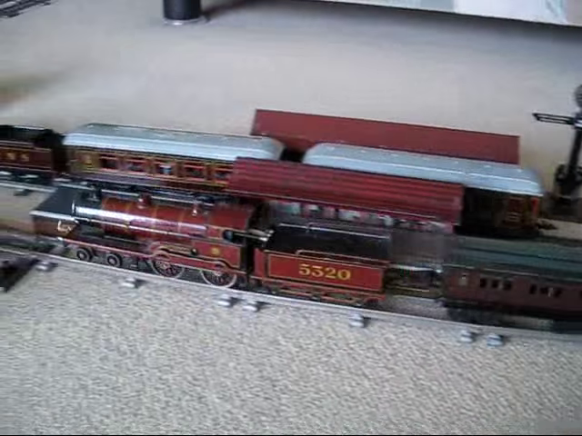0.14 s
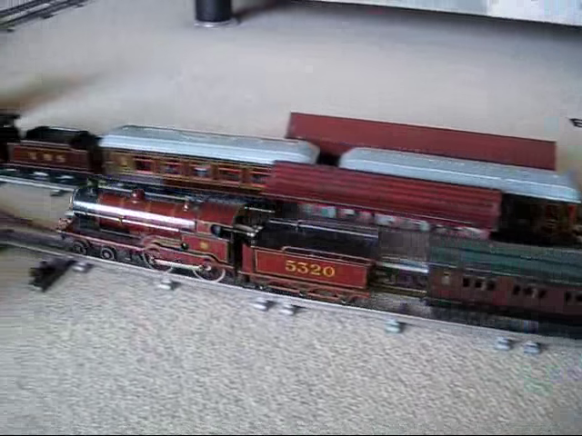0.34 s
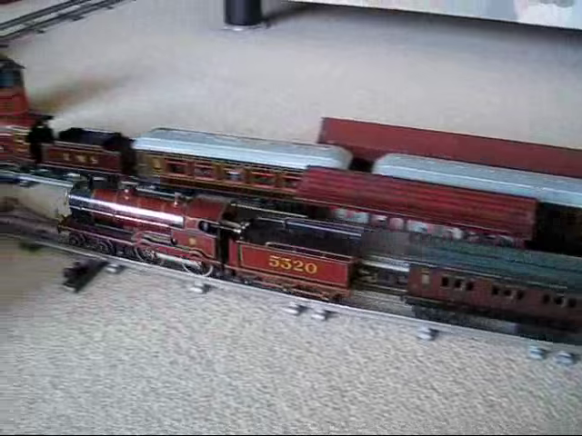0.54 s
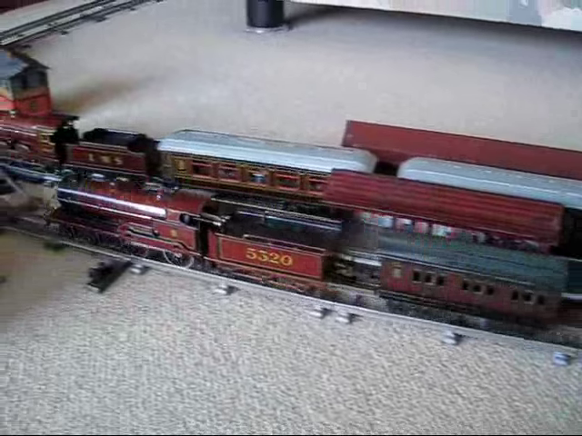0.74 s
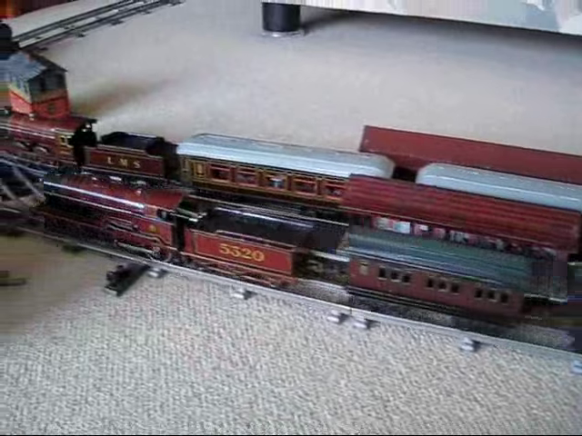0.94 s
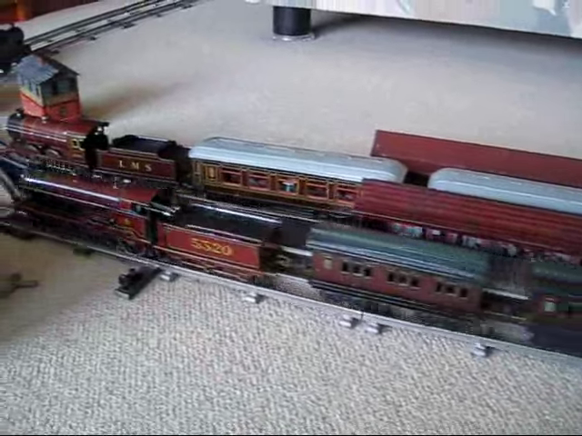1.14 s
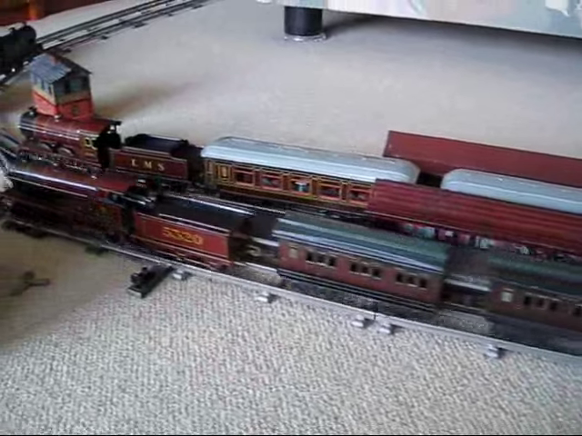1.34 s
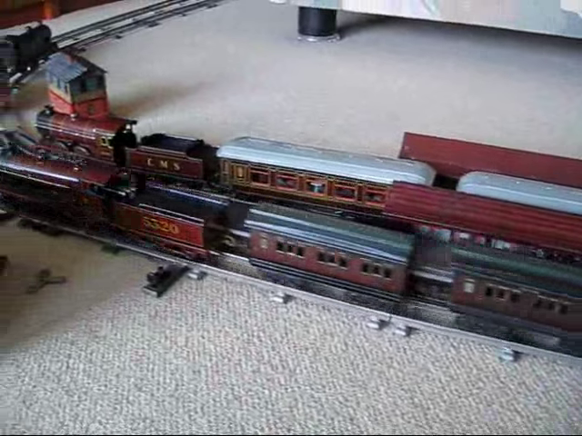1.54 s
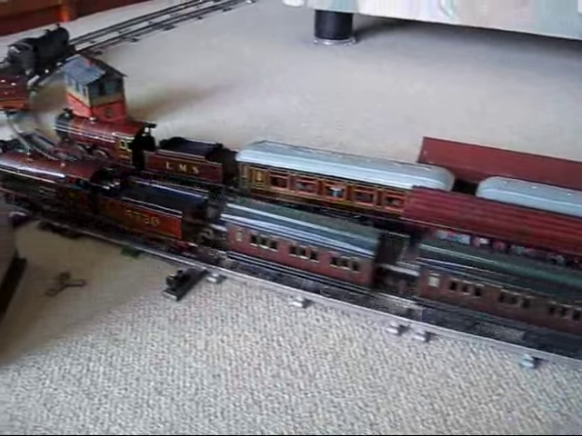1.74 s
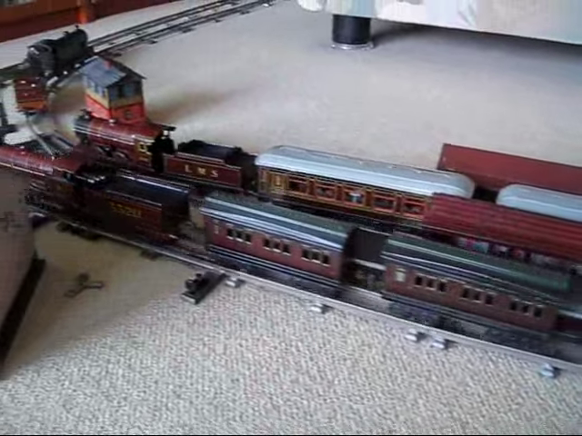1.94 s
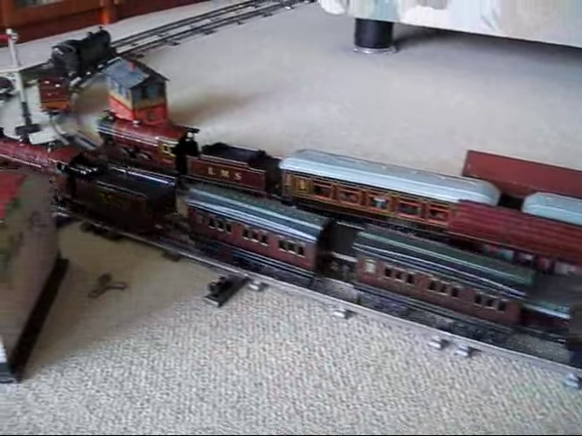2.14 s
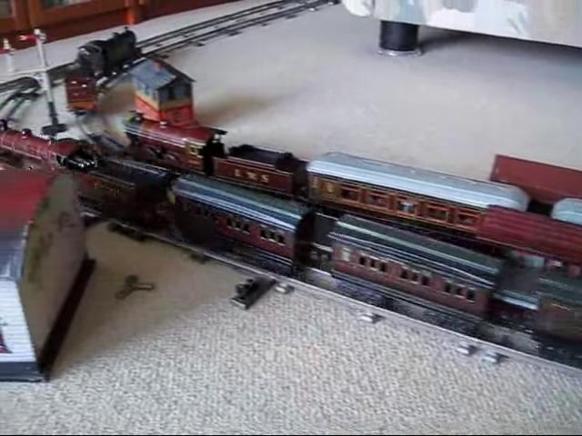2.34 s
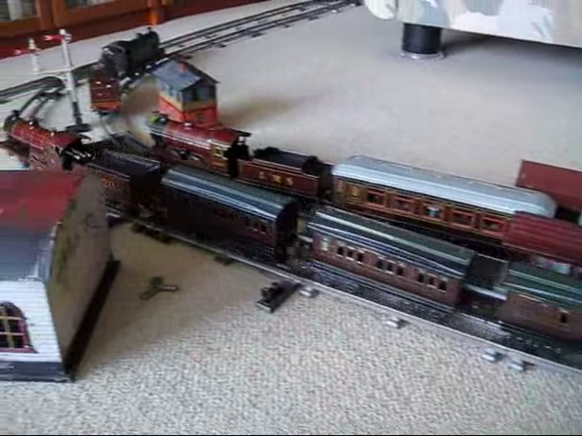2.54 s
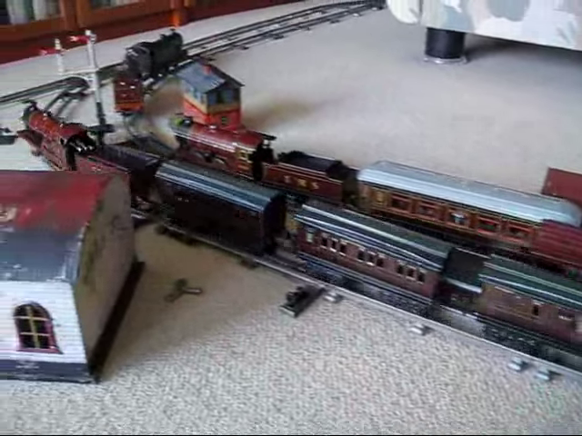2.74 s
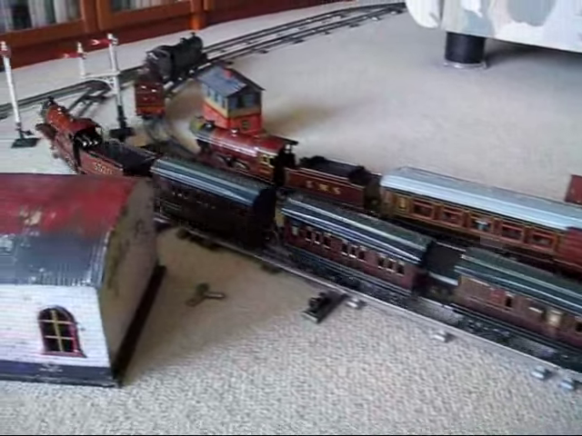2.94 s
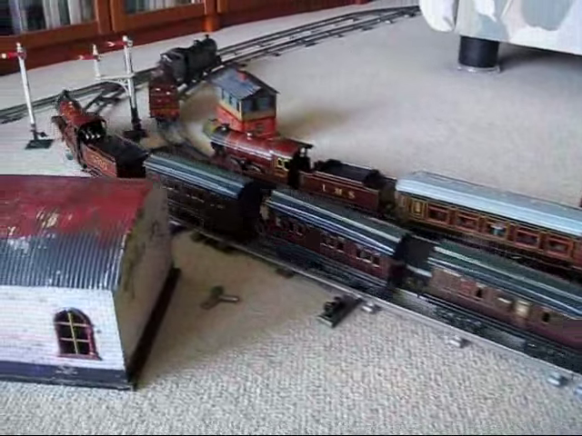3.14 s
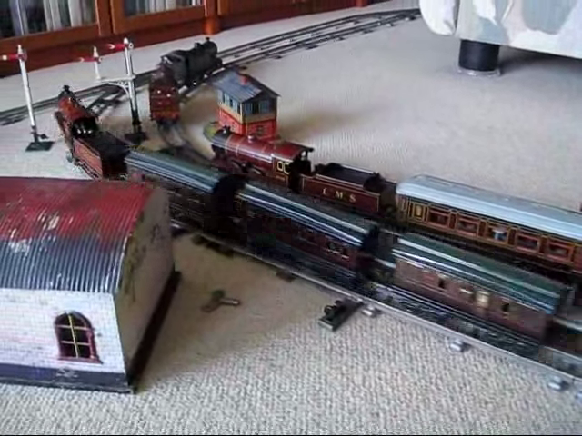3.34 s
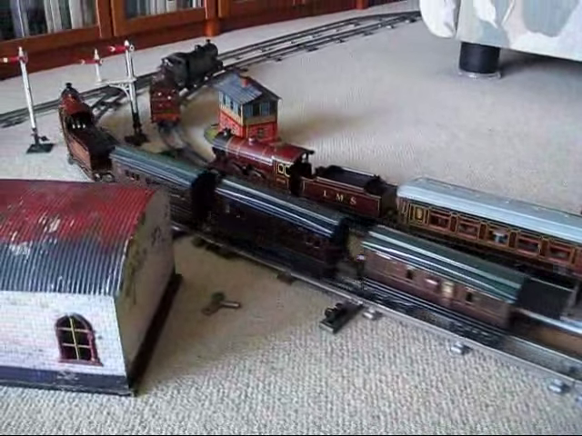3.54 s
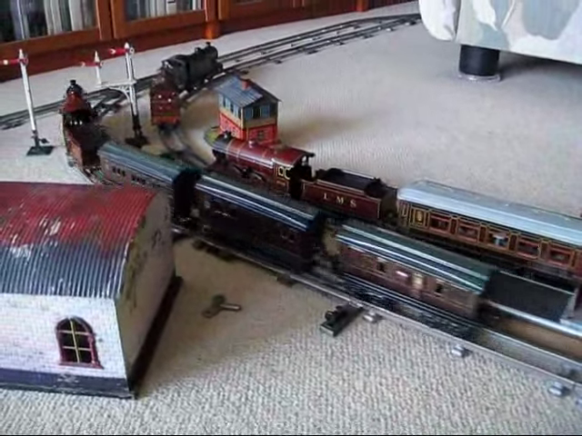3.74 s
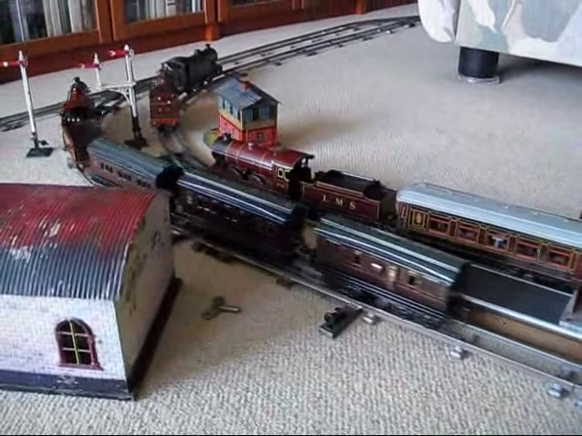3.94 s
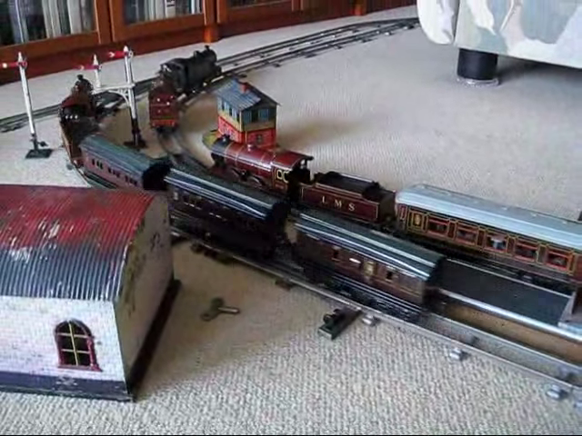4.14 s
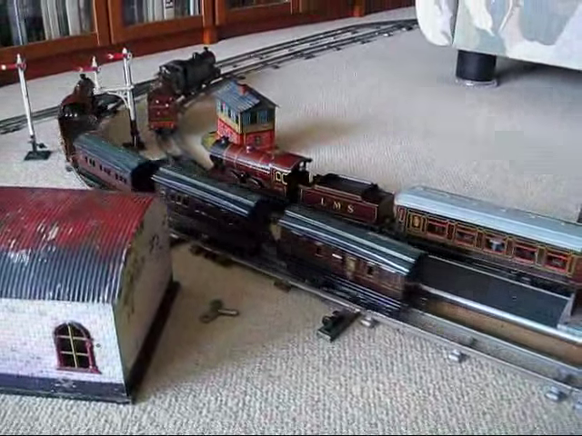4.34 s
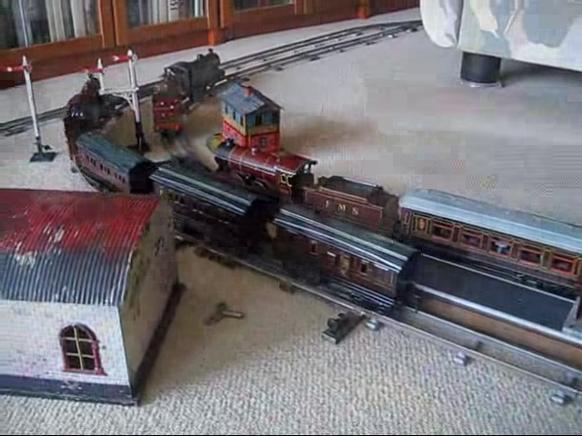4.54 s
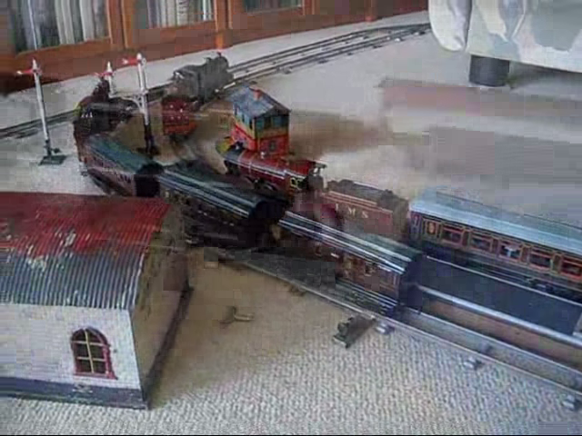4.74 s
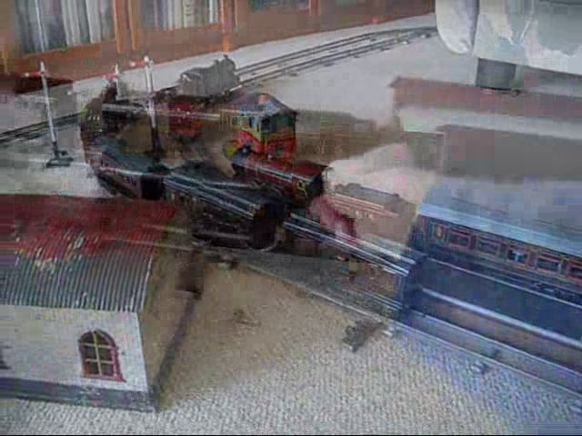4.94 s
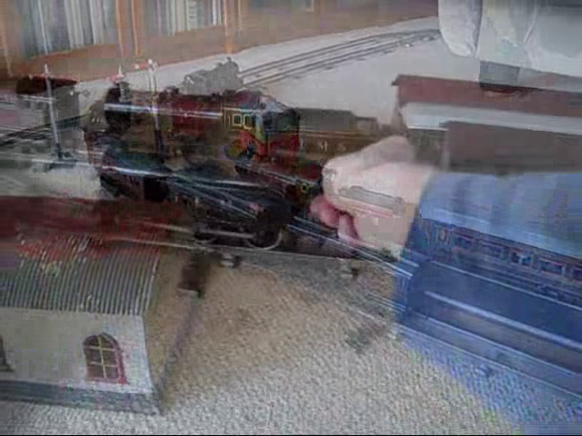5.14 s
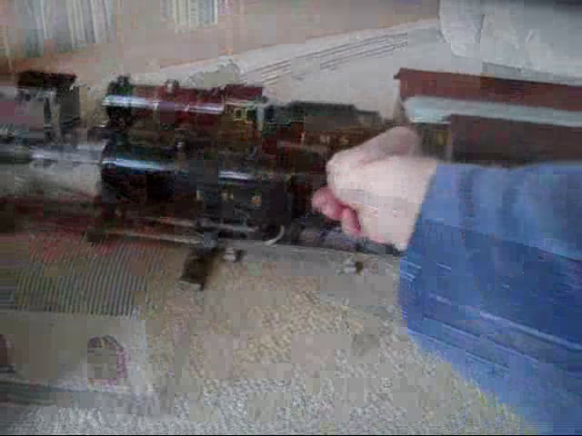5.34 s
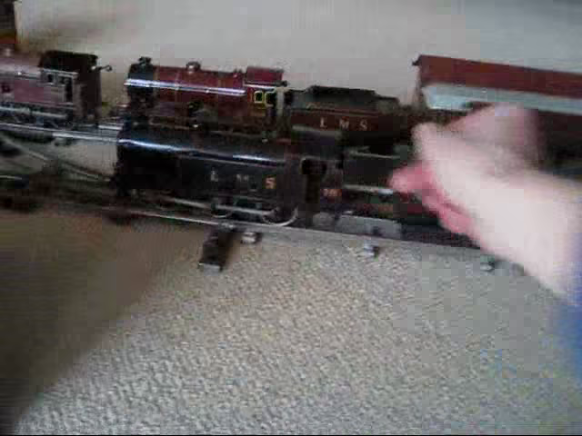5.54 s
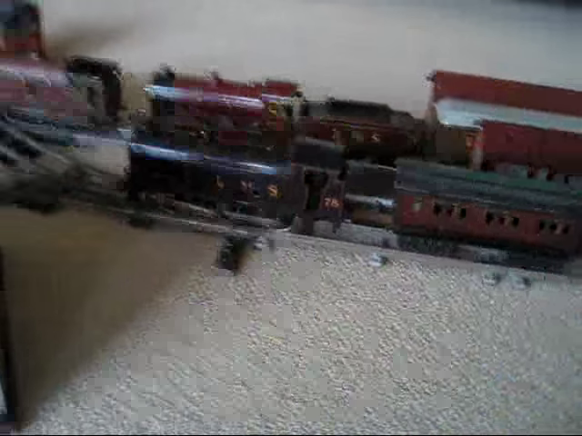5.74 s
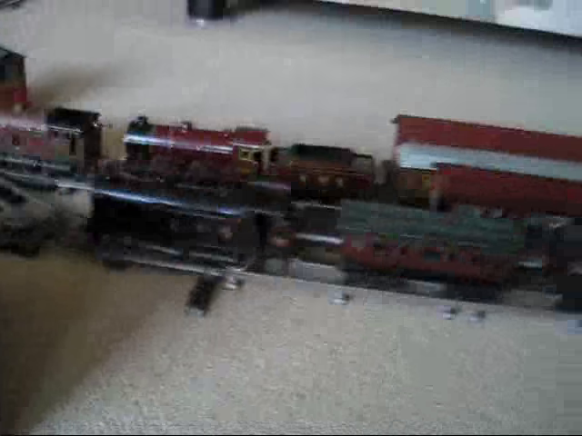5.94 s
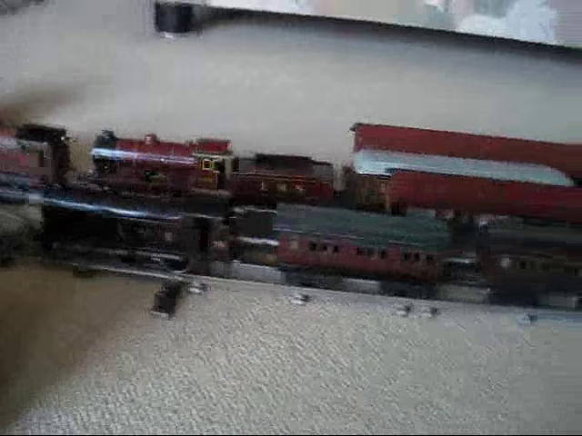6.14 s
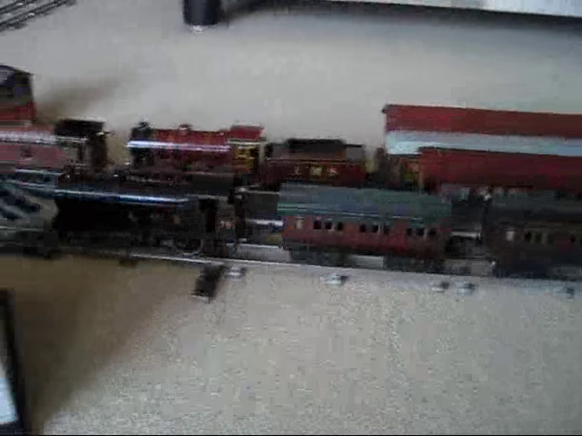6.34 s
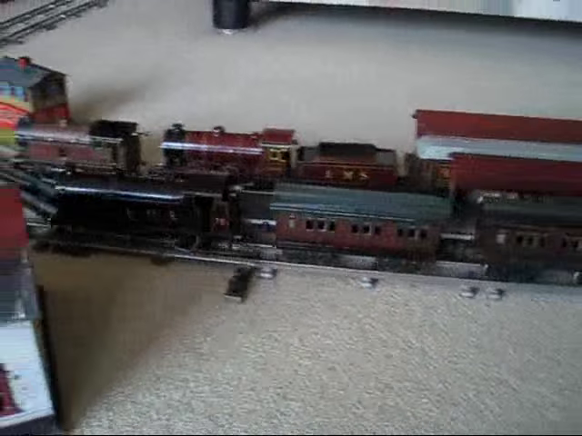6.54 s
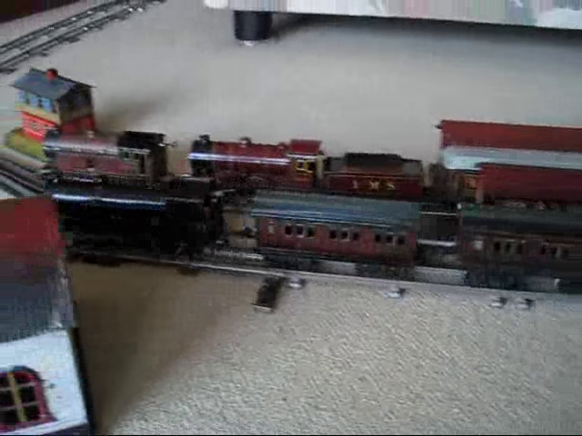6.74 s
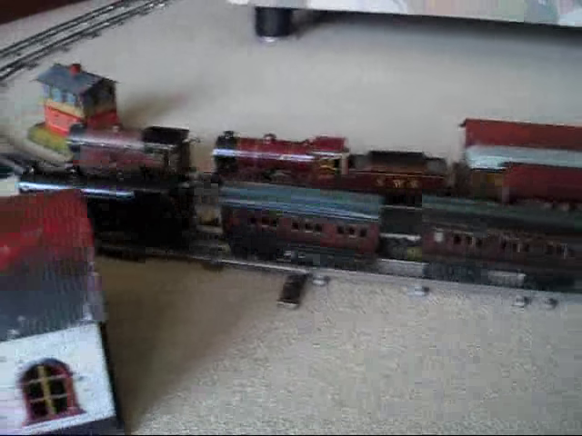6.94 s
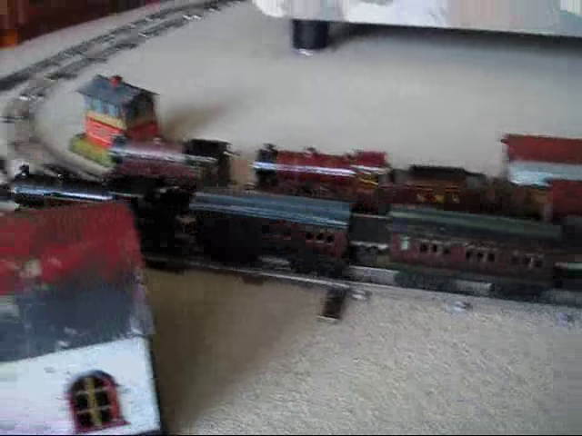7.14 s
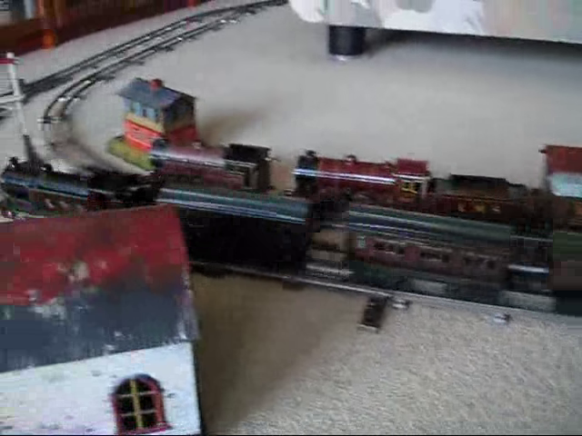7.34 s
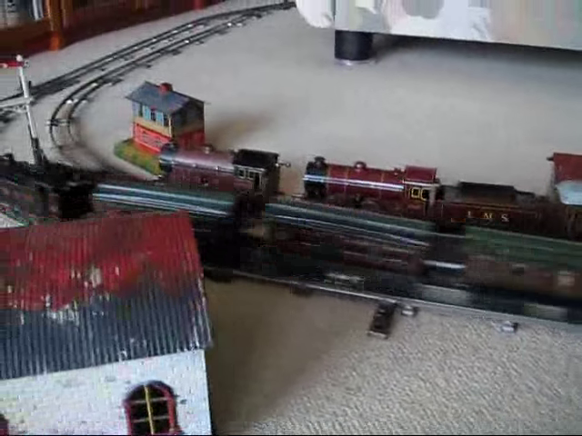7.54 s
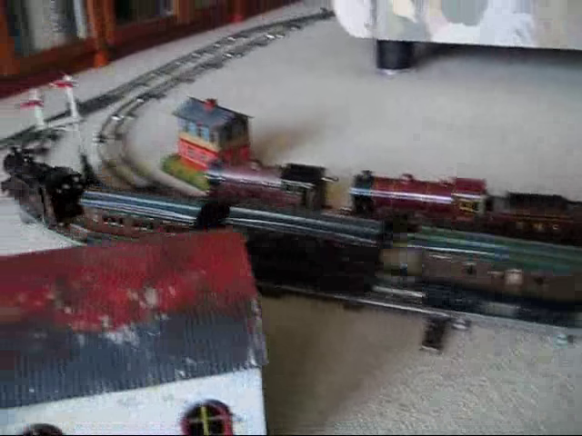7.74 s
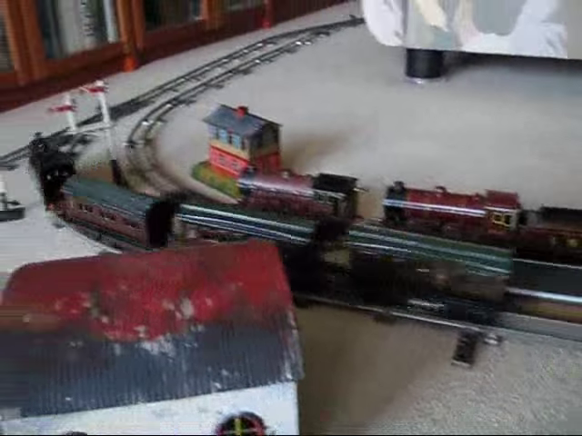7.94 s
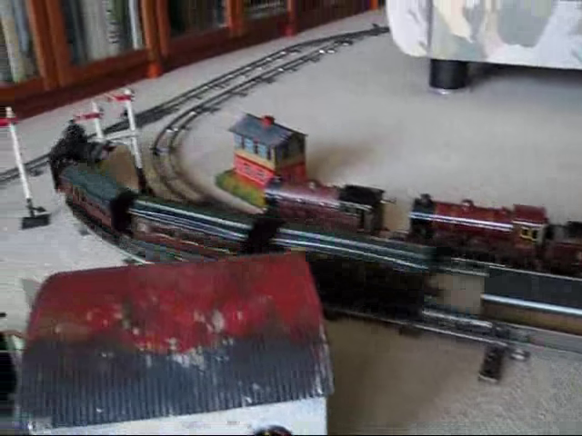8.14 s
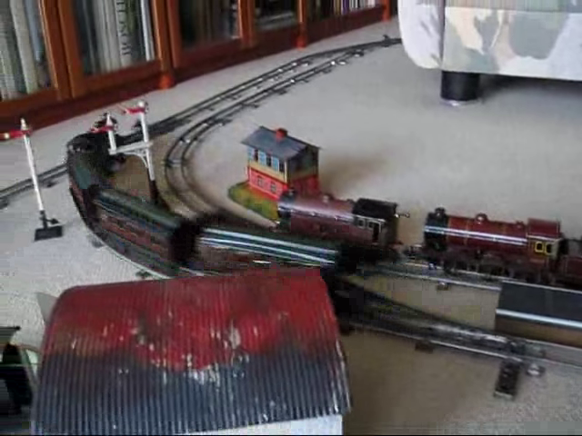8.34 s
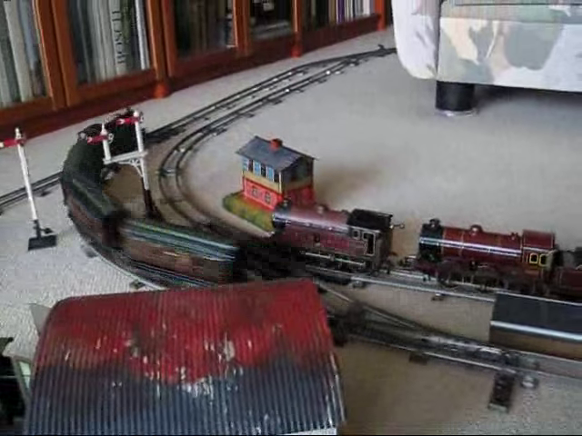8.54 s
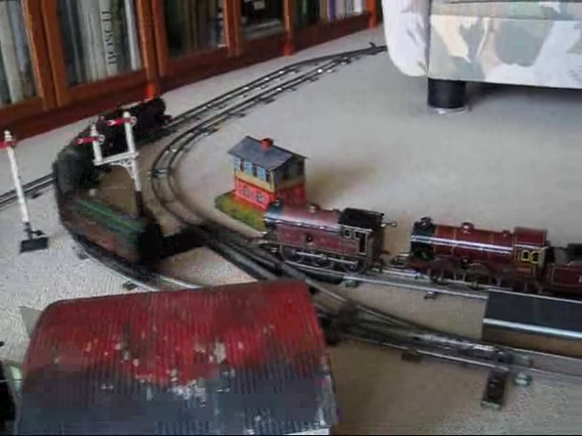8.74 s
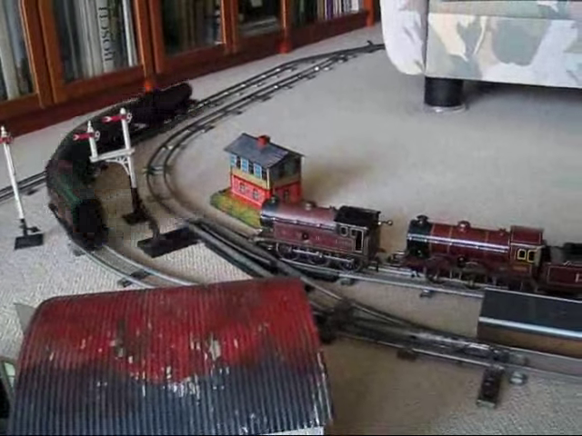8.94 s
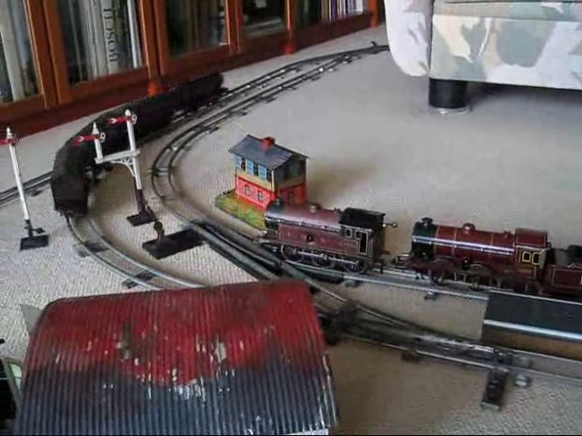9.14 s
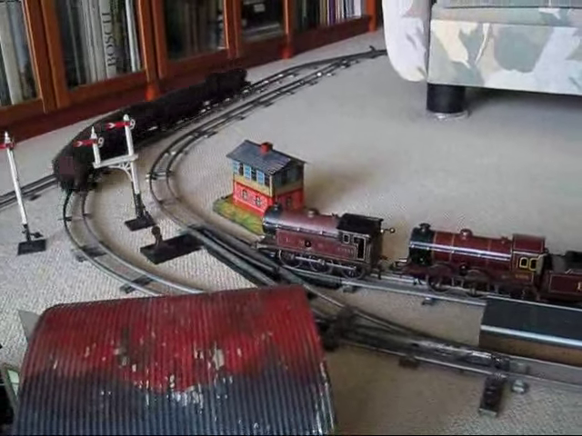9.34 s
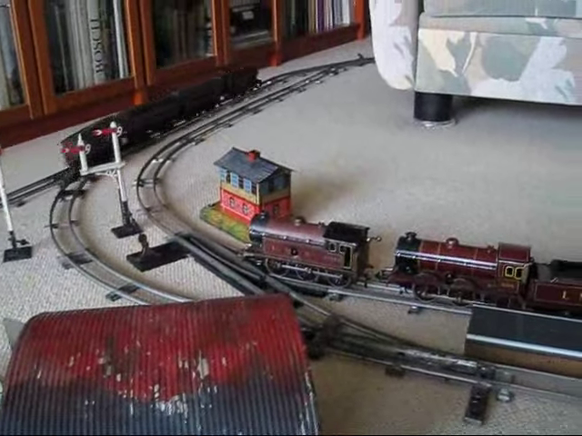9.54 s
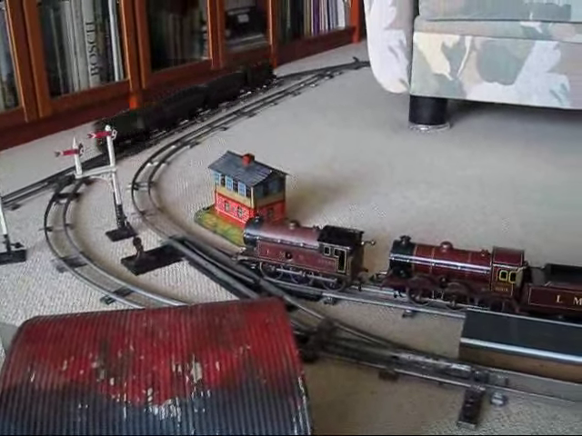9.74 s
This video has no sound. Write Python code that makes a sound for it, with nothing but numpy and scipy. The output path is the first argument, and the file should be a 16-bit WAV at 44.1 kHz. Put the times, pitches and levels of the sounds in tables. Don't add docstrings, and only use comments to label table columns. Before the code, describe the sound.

Clockwork tin train rattles past on metal track and fades, then couplings clank and a second one whirs up to speed close by.

```python
import sys
import numpy as np
from scipy import signal
from scipy.fft import rfft, irfft, next_fast_len
from scipy.io import wavfile
from scipy.ndimage import uniform_filter1d, map_coordinates

SR = 44100
rng = np.random.default_rng(int(sys.argv[2]) if len(sys.argv) > 2 else 0)


def pcm_store(signal):
    levels = np.round(np.clip(np.atleast_2d(signal), -1, 1) * 32767)
    wavfile.write(sys.argv[1], SR, levels.astype(np.int16).T)


def voltage_ratio(decibels):
    exponent = np.asarray(decibels, float) / 20
    return 10 ** exponent


N = 436149

STAGE_S = (0, 4.9, 7.87, 9.89)
# time in [s], rattle in [dB].
LEAVING = [
    (0, -23.5),
    (1.9, -23.5),
    (2.3, -22.5),
    (2.7, -24.5),
    (3.3, -27),
    (3.65, -30.5),
    (4.2, -34.5),
    (4.55, -42),
    (4.75, -54),
    (5.25, -62),
]
# time in [s], rattle in [dB], speed [0-1].
STARTING = [(5.5, -54, 0.5), (5.78, -50.5, 0), (6.05, -45, 0), (6.2, -42.5, 0), (6.24, -42, 0),
            (6.5, -33, 0.1), (6.9, -23.5, 0.57), (7.38, -19, 0.98), (8.1, -23, 1), (8.6, -23, 0.97),
            (8.85, -22.5, 0.83), (9.2, -21.5, 0.87), (9.89, -22.5, 0.91)]
# time in [s],
# level in [dB].
AIR_LEVEL = [(0, -1.5), (1.3, -1.5), (2.15, -0.5), (2.45, -2), (4, 0), (5.53, -1), (5.66, 11), (5.8, -5),
             (6.3, -6), (7, -1), (8.84, 0), (9.89, 2.5)]
# time in [s], share [1].
RAGGED = [(0, 1.26), (3, 1.18), (4.6, 1.55), (6.1, 1.4), (6.5, 1), (7.8, 0.84), (8.7, 0.84), (9.89, 0.63)]
# frequency in [Hz], density in [dB per Hz].
BODY = [
    [(71, -66), (120, -33.5), (191, -11.5), (286, -12.5), (497, -3), (605, -5.5), (950, -4.5), (1280, -3), (1900, -4), (2470, -10), (4180, -120)],
    [(71, -60), (120, -24), (279, -9), (347, -7.5), (605, -2.5), (687, 2.5), (1210, -1.5), (1490, -11), (1900, -3.5), (2470, -57), (4180, -120)],
    [(71, -59), (120, -36), (276, -11.5), (343, -15.5), (503, -7.5), (565, -10.5), (671, -4), (1120, -4), (1900, -5.5), (2470, -42), (4180, -120)],
]
TIN = [
    [(940, -28), (1600, -17), (2530, -1.5), (3130, 1), (3740, -0.5), (4070, -2), (4990, 0), (6530, -5), (7210, -12.5), (7700, -11), (10000, -27), (16900, -120)],
    [(940, -27), (1600, -6.5), (1860, -4.5), (2370, -2.5), (3210, 2), (3570, -1), (3860, 1), (4770, -0.5), (6360, -2), (7260, -15), (7700, -40), (10000, -44), (16900, -120)],
    [(940, -27), (1600, -22), (1850, -2.5), (2010, -8), (2180, -1.5), (3130, -0.5), (3360, -3), (4100, -4.5), (5770, -3.5), (7020, -10), (7700, -13), (10000, -43), (16900, -120)],
]
FIZZ = [
    [(4760, -45), (8100, -14), (8540, 3), (9610, 10.5), (11400, 10.5), (12200, 8), (15900, -35), (22000, -120)],
    [(4760, -39), (8100, 8), (8440, -3.5), (9270, 3), (11000, 4), (11500, 1.5), (12400, 1), (16100, -40), (22000, -120)],
    [(4760, -67), (8100, -11.5), (9230, -3), (10000, -2.5), (10900, 2), (11500, 0), (12400, -5), (16100, -38), (22000, -120)],
]
# centre in [Hz], width in [Hz], level in [dB].
HOLLOW = [
    [(292, 16.6, -5), (690, 22, 1), (752, 19, 3.5), (879, 66, 2), (1018, 53, 3), (1161, 35, 1)],
    [(685, 33, -4), (926, 21, 4), (1052, 78, 2.5), (1295, 150, 1), (2150, 390, -4)],
]
# centre in [Hz], width in [Hz], level in [dB].
PANELS = [(3200, 140, 0.5), (3950, 124, 13.5), (4280, 220, 4.5), (4660, 93, 12.5)]
ROOF = [(11280, 270, 0)]
BOILER = [(1030, 280, -1), (2020, 140, -0.5)]
# time in [s], extra level in [dB], half length in [s].
FIRST_SHUDDERS = [(0.031, -5, 0.0063), (0.106, -3, 0.036), (0.289, 2, 0.011), (0.322, -5, 0.005),
                  (0.567, 5, 0.014), (0.606, -9, 0.0027), (0.624, -2, 0.033), (0.814, -7, 0.0087),
                  (0.903, 2, 0.027), (1.129, 0, 0.014), (1.225, 5.5, 0.0081), (1.491, -3, 0.011),
                  (1.508, 5, 0.0075), (2.168, 2, 0.02), (2.283, 4.5, 0.014), (2.479, 1, 0.011),
                  (2.713, 1, 0.015), (2.898, 3, 0.013), (3.074, 6, 0.017), (3.172, 6, 0.01),
                  (3.306, 0, 0.009), (3.43, 2, 0.011), (3.797, 5.5, 0.0089), (4.09, -2.5, 0.03),
                  (4.224, -8, 0.005), (4.256, -2, 0.012)]
SECOND_SHUDDERS = [(6.55, 7, 0.0051), (6.583, 2, 0.0091), (6.69, 1, 0.004), (6.708, 5.5, 0.014),
                   (6.767, -2, 0.028), (6.878, -4.5, 0.02), (6.901, 7, 0.011), (6.95, 3, 0.0063),
                   (7.067, -5, 0.014), (7.116, 4, 0.01), (7.182, 3, 0.0095), (7.2, 2, 0.0055),
                   (7.309, 2.5, 0.0092), (7.392, -6, 0.007), (7.654, -6, 0.014), (7.708, -4.5, 0.02),
                   (7.753, 3, 0.03), (7.826, 5, 0.0074), (7.989, 5, 0.0058), (8.014, 10, 0.018),
                   (8.376, 1.5, 0.028), (8.84, 4, 0.03), (9.501, -4, 0.02), (9.618, -3.5, 0.015)]
SHUDDER_SHARES = (.65, .8, .5)
# time in [s], peak in [dB], ring in [Hz].
FIRST_JOINTS = [(0.0245, -1, 4430), (0.1523, -14, 3700), (0.218, -19, 3090), (0.2838, -11, 3400),
                (0.3955, -12, 2980), (0.4757, -4, 4170), (0.7846, -27, 3200), (0.848, -6, 2680),
                (0.8998, -3, 4630), (0.948, -9, 3800), (1.1218, 0.5, 4600), (1.1493, -14, 3230),
                (1.2194, -5, 4900), (1.3705, -2, 4870), (1.509, -3, 4800), (1.6207, -21, 3950),
                (1.7938, -17, 4190), (1.854, -8, 3170), (1.924, 0.5, 4860), (2.1415, -9, 3340),
                (2.2383, -3, 4140), (2.474, 1.5, 3340), (2.6808, -5, 5400), (2.769, -2, 4100),
                (2.893, -4, 3200), (3.1168, -7, 2750), (3.166, -9, 2770), (3.2857, -4, 3300),
                (3.43, -5, 3530), (3.62, -24, 4750), (3.71, -8, 2860)]
SECOND_JOINTS = [(6.5439, -19, 11300), (6.5694, -6, 4000), (6.6527, -6, 3970), (6.6841, -5, 5030),
                 (6.7195, -3, 10540), (6.7938, -1, 3120), (6.8956, -7, 3060), (6.9435, -7, 4280),
                 (7.0393, 0, 4000), (7.1241, -12, 4140), (7.1765, -5, 3250), (7.3092, -15, 4000),
                 (7.3561, -3, 11200), (7.398, -9, 3230), (7.608, -3, 4100), (7.6634, -5, 4720),
                 (7.7352, -8, 2810), (7.9826, -11, 3390), (8.1009, -3.5, 4670), (8.1523, -6, 4730),
                 (8.2585, -6, 4120), (8.3363, -16, 5000), (8.3777, -9, 10800), (8.713, -5, 11200),
                 (8.8297, -4, 2500), (8.8851, -3, 11000), (9.1151, -4, 10900), (9.22, -10, 3070),
                 (9.3675, -19, 3130), (9.602, -4, 11100)]
# time in [s], peak in [dB],
# pitch in [Hz].
SPIKES = [(0.0249, -7.0, 4390.0), (0.2848, -8, 4610.0), (0.3965, -6, 4780.0), (0.7859, -8, 2500),
          (0.9011, -8, 4650.0), (0.9303, -12, 3830.0), (1.0315, -10, 4900), (1.1505, -9, 2840.0),
          (1.3705, -9, 4780.0), (1.5095, -8.0, 4310.0), (1.9253, -7, 4870.0), (2.1428, -9.0, 3320.0),
          (3.792, -16, 3190.0), (4.2868, -21, 4690.0), (4.3058, -22.0, 2980), (4.4316, -23, 2670.0),
          (7.1778, -8, 3270.0), (7.3102, -3, 5990.0), (7.9835, -13, 3140.0)]
MORE_SPIKES = [(0.0795, -15, 4540), (0.1533, -9, 3600), (0.2177, -12, 3230), (0.3113, -13, 3140),
               (0.4919, -8, 4350), (0.6155, -16, 3880), (0.6632, -8, 4400), (0.6742, -9, 3900), (0.6926, -7, 2600),
               (0.7991, -11, 2970), (0.8577, -10, 4480), (0.9505, -7, 4310), (1.0054, -8, 4310),
               (1.0464, -14, 4870), (1.1234, -10, 4440), (1.3424, -8, 4900), (1.9033, -19, 3660),
               (2.1719, -8, 4220), (2.3746, -6, 3170), (2.483, -6, 2980), (3.3967, -17, 3320), (3.4318, -9, 5860),
               (3.9084, -20, 2410), (3.9644, -11, 10340), (4.0966, -21, 5210), (4.1874, -20, 2840),
               (4.2313, -26, 2630), (6.5018, -18, 4260), (6.5701, -16, 4180), (6.5849, -16, 4130),
               (6.6028, -21, 5640), (6.6277, -19, 4440), (6.6572, -16, 4130), (6.685, -14, 5170),
               (6.7389, -16, 3830), (6.7949, -19, 3000), (6.8117, -11, 4130), (6.9022, -13, 3270),
               (6.9464, -8, 4180), (7.0421, -16, 3880), (7.131, -12, 4050), (7.199, -7, 3140), (7.2365, -12, 4260),
               (7.2645, -8, 4090), (7.3569, -7, 11150), (7.6642, -7, 4650), (7.7372, -7, 4130), (7.7533, -8, 2710),
               (7.8797, -4, 4910), (8.3377, -13, 2840), (8.3787, -13, 2020), (8.6648, -15, 2330),
               (8.6797, -10, 10940), (8.6929, -8, 3010), (9.1993, -11, 2020), (9.3234, -9, 11110),
               (9.4196, -13, 10770), (9.6028, -6, 10980), (9.6257, -14, 2070), (9.7744, -13, 4220),
               (9.8715, -10, 11020)]
# time in [s], peak in [dB], pitch in [Hz].
BOOMS = [(0.553, -11, 918), (0.73, -13, 1060), (1.145, -17, 967), (1.602, -13, 967), (1.719, -19, 890),
         (1.777, -13, 990), (1.829, -14, 1040), (2.003, -19, 1050), (2.078, -18, 1000), (2.342, -17, 990),
         (2.776, -19, 1130), (2.822, -21, 1026), (2.898, -18, 1054), (3.068, -21, 1153)]
# time in [s], peak in [dB], pitch in [Hz], t60 in [s].
CLINKS = [(0.6708, 0.5, 6450, .006), (6.3785, -7.5, 3300, .0035), (6.225, -27, 1000, .09),
          (6.387, -24, 1230, .05), (5.648, -22, 1060, .16), (5.622, -25, 1090, .07),
          (5.674, -29, 2100, .05), (4.993, -40, 1030, .3), (5.1338, -20, 5600, .005),
          (5.1285, -23, 4400, .006), (5.519, -26, 3800, 0.045), (5.521, -29, 4230, .04),
          (5.522, -30, 3400, .09), (6.087, -37, 11500, 0.027), (6.72, -7, 10800, .005)]
# time in [s], peak in [dB], body in [dB over peak], ring in [Hz], fizz in [dB over peak].
SNAPS = [(0.5538, -18, 0, 4200, -18), (3.4818, -16.5, -4, 3440, -4), (3.9224, -15.5, -7, 3190, -12),
         (3.9495, -15.5, -12, 3120, -12), (4.126, -18.5, -23, 4330, -10.5), (4.19, -23, -20, 4300, -15),
         (4.4864, -31, -15, 4200, -5), (4.697, -28, -5, 3050, -20), (4.744, -31, -18, 3230, -10),
         (4.984, -25, -6, 3760, -17), (5.5199, -26.5, -21, 4120, -11), (5.606, -13.5, -12, 3960, -19),
         (5.6196, -13, -10, 5540, -9), (5.6487, -25, -5, 3100, -14), (5.7291, -14, -7, 4740, -16),
         (5.956, -21, -3.5, 4500, -17), (6.141, -12, -30, 4110, -18), (6.218, -18.5, -8, 3800, -19),
         (6.26, -37, -9, 4000, -12), (6.301, -21, -20, 4260, -10), (6.41, -26, -11, 4690, -4)]
TICKS = [(4.6322, -28, -12, 4100, -21), (4.806, -30, -23, 2800, -22), (4.8525, -32, -17, 2890, -21),
         (4.934, -26, -19, 4940, -19), (5.0328, -27.5, -4, 6170, -21), (5.076, -31, 0, 2330, -19),
         (5.117, -29, -8, 4240, -15), (5.125, -18.5, -6.5, 2890, -16), (5.13, -19, -20, 6220, -14),
         (5.143, -28, -28, 2820, -8), (5.4672, -33, -1, 2720, -15), (5.4776, -27.5, -6, 5470, -16),
         (5.5016, -28, -26, 3780, -16), (5.679, -21, -19, 2120, -11), (5.843, -41, -8, 3100, -12),
         (5.868, -40, -12, 2500, -8), (5.908, -30, 0, 3130, -11), (5.979, -22.5, -5, 4850, -10),
         (5.596, -28, 4, 3900, -18), (6.16, -13, -25, 3370, -28), (6.168, -26, -19, 4080, -29),
         (6.2845, -32, -6, 3930, -13), (6.345, -22, -14, 4900, -7), (6.4595, -24, 0, 3970, -4)]
# frequency in [Hz], t60 in [s].
ROOM = [(200, 0.39), (2000, 0.27), (10000, 0.095)]
# frequency in [Hz], level in [dB].
HUSH = [(25, -13), (60, -2), (200, -1.5), (1200, -6), (2500, -11), (5500, -17), (7300, -18), (9000, -17),
        (13000, -20)]
# time in [s], depth in [dB], recovery in [s].
DUCKS = [(2.295, 3.5, .05), (8.904, 2, 0.058), (7.864, 7, 0.35), (8.035, 2, 0.062), (8.23, 6.5, 0.048),
         (8.295, 2, 0.064), (8.39, 4.5, 0.051), (8.555, 5, 0.065), (8.639, 4.5, 0.059)]
# time in [s], notch in [Hz], top in [Hz].
EDGE = [(0, 7850, 12300), (2.9, 7850, 12200), (3.3, 7830, 12000), (4, 7780, 11900), (4.15, 7820, 12100),
        (4.7, 7900, 12450), (6.3, 7900, 12720), (9.5, 7920, 12550), (9.89, 7900, 12250)]


def unit(x):
    return x / np.sqrt(np.mean(x ** 2) + 1e-20)


def along(points, hz):
    f, v = np.transpose(points)
    return np.interp(np.log(hz + 1), np.log(f + 1), v)


def curves(rows):
    s, *cols = np.transpose(rows)
    return [np.interp(np.arange(N) / SR, s, c) for c in cols]


def wobble(rate):
    return map_coordinates(rng.standard_normal(int(N * rate / SR) + 4), [np.arange(N) * rate / SR])


def filtered(x, response):
    m = next_fast_len(len(x) + SR // 4)
    return irfft(rfft(x, m) * response(np.fft.rfftfreq(m, 1 / SR)), m)[:len(x)]


def resonant(modes):
    return lambda f: sum((-1) ** k * voltage_ratio(db) * 1j * f * w / (c * c - f * f + 1j * f * w)
                         for k, (c, w, db) in enumerate(modes))


def staged(x, responses):
    out, pad = np.zeros(N + 2 * SR), SR // 4
    x = np.pad(x, (pad, SR))
    for start, end, response in zip(STAGE_S, STAGE_S[1:], responses):
        a, b = round(start * SR), round(end * SR) + 1
        out[a:b + 2 * pad] += filtered(np.pad(x[a + pad:b + pad], pad), response)
    return out[pad:pad + N]


def coloured(x, spectra):
    hz = np.linspace(0, SR / 2, 4096)
    tint = lambda c: lambda f: voltage_ratio(along(c, f)) / np.sqrt(np.mean(voltage_ratio(along(c, hz)) ** 2))
    return staged(x, [tint(c) for c in spectra])


def hollow(x):
    first, second = HOLLOW
    return staged(x, [resonant(first), resonant(second), resonant(second)])


def levels():
    t = np.arange(N) / SR
    away_db, = curves(LEAVING)
    first = [away_db - 4.5, away_db, away_db - 13 + 0.07 * (away_db + 24)]

    near_db, speed = curves(STARTING)
    lurch_s, rise_s, fall_s = 5.65, 0.045, 0.065
    off = np.where(t < lurch_s, (lurch_s - t) / rise_s, (t - lurch_s) / fall_s)
    lurch_db = 15 * np.exp(-off ** 2)
    near_db = near_db + lurch_db
    slow_body_db, fast_body_db = 1.2, -9
    body_db = near_db - 0.5 * lurch_db + slow_body_db + speed * (fast_body_db - slow_body_db)
    far_fizz_db = 3.5 * np.clip(t - STAGE_S[2], 0, 1)
    second = [body_db, near_db, near_db - 10.5 + far_fizz_db]

    shudders = list(FIRST_SHUDDERS) + list(SECOND_SHUDDERS)
    shudder_db = sum(db * np.clip(1 - np.abs(t - s) / (2 * half), 0, 1) for s, db, half in shudders)
    return np.where(t < STARTING[0][0], first, second) + np.outer(SHUDDER_SHARES, shudder_db)


def bumps(rate, spread_db, most_db, t60, crack, count=8):
    t = np.arange(SR // 12) / SR
    out = np.zeros(N)
    for part in range(count):
        place, life, phase = rng.random((3, 30, 1))
        hz = 13000 * np.abs(part + 3 * place - 1) / count
        modes = np.sin(2 * np.pi * (hz * t + phase)) * voltage_ratio(-60 * t / (t60 * (0.26 + life)))
        ring = modes.sum(axis=0) / 5 * (1 - np.exp(-t / 0.0005))
        ring += crack * rng.standard_normal(len(t)) * voltage_ratio(-60 * t / 0.0026)
        when, size, sign = rng.random((3, 6000))
        size_db = most_db * np.tanh(-spread_db * np.log(size) / most_db)
        struck = np.arange(len(when)) < rate / count * N / SR
        knocks = np.bincount((when * N).astype(int), struck * voltage_ratio(size_db) * np.sign(sign - 0.5), N)
        out += signal.oaconvolve(knocks, ring)[:N]
    lines = rfft(out)
    return unit(irfft(lines / np.sqrt(uniform_filter1d(np.abs(lines) ** 2, size=1200) + 1e-9), N))


def grit():
    when, size, sign = rng.random((3, int(700 * N / SR)))
    size_db = np.minimum(-5 * np.log(size), 12.5)
    ticks = np.bincount((when * N).astype(int), voltage_ratio(size_db) * np.sign(sign - 0.5), N)
    t = np.arange(-SR // 500, SR // 200) / SR
    tick = rng.standard_normal(len(t)) * voltage_ratio(-60 * np.abs(t) / 0.003 * (1.5 + (t < 0)))
    return unit(signal.oaconvolve(ticks, tick)[:N])


def rolling():
    body_db, tin_db, fizz_db = levels()
    ragged, = curves(RAGGED)
    _, speed = curves(STARTING)
    shake_db = ragged * (0.25 * wobble(9) + 1.2 * np.tanh(0.53 * wobble(40)))
    rattle = bumps(rate=1500, spread_db=3.5, most_db=15, t60=0.055, crack=0.65)

    def blend(share):
        return share * rattle + np.sqrt(1 - np.clip(share, 0, 1) ** 2) * rng.standard_normal(N)

    air = voltage_ratio(curves(AIR_LEVEL)[0]) * unit(hollow(rng.standard_normal(N)))
    roar = coloured(blend(0.5 * ragged), BODY) + air

    panels = voltage_ratio(-5.5) * unit(filtered(blend(0.9), resonant(PANELS)))
    panels = panels * voltage_ratio(5 * (1 - speed) * (np.arange(N) > STAGE_S[1] * SR))
    roofs = voltage_ratio(-17.5) * speed * unit(filtered(blend(0.97), resonant(ROOF)))
    ticks = 0.4 * grit()
    clatter = coloured(blend(0.71 * ragged) + ragged * ticks, TIN) + panels + roofs
    sizzle = coloured(blend(0.94) + 0.5 * ragged * ticks, FIZZ)

    body = voltage_ratio(body_db - 0.4 + shake_db) * roar
    tin = voltage_ratio(tin_db - 3.0 + shake_db + 0.12 * wobble(15)) * clatter
    fizz = voltage_ratio(fizz_db + 1.5 + 0.5 * shake_db + 0.35 * wobble(15)) * sizzle
    return body + tin + fizz


def hush():
    return voltage_ratio(-52.5) * unit(filtered(rng.standard_normal(N), lambda hz: voltage_ratio(along(HUSH, hz))))


def joints():
    ping, tin, fizz = np.zeros((3, N + SR))
    t = np.arange(SR // 12) / SR
    swell = 1 - np.exp(-t / 0.005)
    for s, db, hz in list(FIRST_JOINTS) + list(SECOND_JOINTS):
        fizz_db = -9.5 if s > STAGE_S[1] else -11.5
        fizz_db += 3.5 * (hz > SR / 6)
        noise = rng.standard_normal((2, len(t))) * voltage_ratio(db - 12.0 - 60 * t / 0.047) * swell
        ping_level = voltage_ratio(-13.5 + 0.45 * db - 60 * t / 0.015) * (1 - np.exp(-t / 0.00022))
        at = slice(round(s * SR), round(s * SR) + len(t))
        ping[at] += ping_level * np.sin(2 * np.pi * hz * t)
        tin[at] += noise[0]
        fizz[at] += voltage_ratio(fizz_db + 7.5) * noise[1]
    return ping[:N] + coloured(tin[:N], TIN) + coloured(fizz[:N], FIZZ)


def room(x):
    hz, t, z = signal.stft(rng.standard_normal(SR // 3), SR, nperseg=256)
    tail = signal.istft(z * voltage_ratio(-60 * t / along(ROOM, hz)[:, None]), SR, nperseg=256)[1]
    return signal.oaconvolve(np.pad(x, (200, 0)), tail / np.linalg.norm(tail))[:N]


def clinks():
    out, t = np.zeros(N + SR), np.arange(SR // 10) / SR
    booms = [(s, db - 5, hz, 0.099) for s, db, hz in BOOMS]
    spikes = [(s, db - 0.5, hz, 0.0057) for s, db, hz in list(SPIKES) + list(MORE_SPIKES)]
    for s, db, hz, t60 in list(CLINKS) + booms + spikes:
        pair = np.sin(2 * np.pi * hz * t) + 0.18 * np.sin(2 * np.pi * 0.95 * hz * t)
        out[round(s * SR):][:len(t)] += voltage_ratio(db - 60 * t / t60) * (1 - np.exp(-t / 0.00019)) * pair
    return out[:N]


def snaps():
    body, tin, fizz, clink = np.zeros((4, N + SR))
    t = np.arange(SR // 3) / SR
    rise = 1 - np.exp(-t / 0.0022)
    tick_t60, snap_t60 = 0.047, 0.088
    blows = [(*row, tick_t60) for row in TICKS] + [(*row, snap_t60) for row in SNAPS]
    for s, db, body_db, hz, fizz_db, t60 in blows:
        noise = rng.standard_normal((3, len(t)))
        spread, phase = rng.random((2, 7, 1))
        jangle = voltage_ratio(db - 12.5) * (voltage_ratio(-60 * t / t60) + 2.0 * voltage_ratio(-60 * t / 0.012)) * rise
        panel_hz = hz * (1 + 0.245 * (spread - 0.5))
        panel = np.sin(2 * np.pi * (panel_hz * t + phase)).sum(axis=0)
        boom = voltage_ratio(db + body_db - 18.0) * (1 - np.exp(-t / 0.0045)) * voltage_ratio(-60 * t / (1.08 * t60))
        at = slice(round(s * SR), round(s * SR) + len(t))
        tin[at] += jangle * noise[0]
        fizz[at] += voltage_ratio(fizz_db + 10) * voltage_ratio(-60 * t / 0.46) * jangle * noise[1]
        clink[at] += 0.44 * jangle * voltage_ratio(-60 * t / 0.15) * panel
        body[at] += boom * noise[2]
    hum = voltage_ratio(1) * coloured(body[:N], BODY) + voltage_ratio(28.0) * filtered(body[:N], resonant(BOILER))
    return hum + clink[:N] + coloured(tin[:N], TIN) + coloured(fizz[:N], FIZZ)


def scene():
    knocks = snaps() + joints()
    return (rolling() + knocks + clinks() + voltage_ratio(-6.0) * room(knocks) + hush())[None]


def roll_off(x):
    return signal.sosfilt(signal.butter(12, 13480, fs=SR, output="sos"), x)


def record(dry):
    t = np.arange(N) / SR
    duck_db = sum(-db * (t > s) * np.clip(1 - ((t - s) / (0.71 * back)) ** 2, 0, 1) for s, db, back in DUCKS)
    treble = filtered(dry[0], lambda f: f > EDGE[0][1])
    ducked = (dry[0] - treble) * voltage_ratio(duck_db) + treble * voltage_ratio(0.86 * duck_db)

    hz, s, z = signal.stft(ducked[None], SR, nperseg=2048)
    hz = hz[:, None]
    frame = np.minimum((s * SR).astype(int), N - 1)
    when, *edges = np.transpose(EDGE)
    notch_hz, top_hz = (np.interp(s, when, edge) for edge in edges)
    below = 300 + 90 * wobble(10)[frame]
    above = 215 + 55 * wobble(10)[frame]
    kept = (hz < notch_hz - below) | (hz > notch_hz + above)
    off = (hz - notch_hz) / 300
    notch = (off ** 2 / (1 + off ** 2)) ** 1.1 * np.where(kept, 1, voltage_ratio(-40))
    top = voltage_ratio(-np.clip(hz - top_hz, 0, 100))
    loud = uniform_filter1d(np.sum(np.abs(z[0]) ** 2, axis=0), size=9) > voltage_ratio(-60)
    gaps = loud & (wobble(16)[frame] > 0.6)
    bass = np.where((hz < 130) & gaps, voltage_ratio(-25), voltage_ratio(0.65 * (hz < 130)))
    mix = signal.istft(z * notch * top * bass, SR, nperseg=2048)[1][:, :N]
    return roll_off(mix)


dry = scene()
out = record(dry)
pcm_store(out)
```